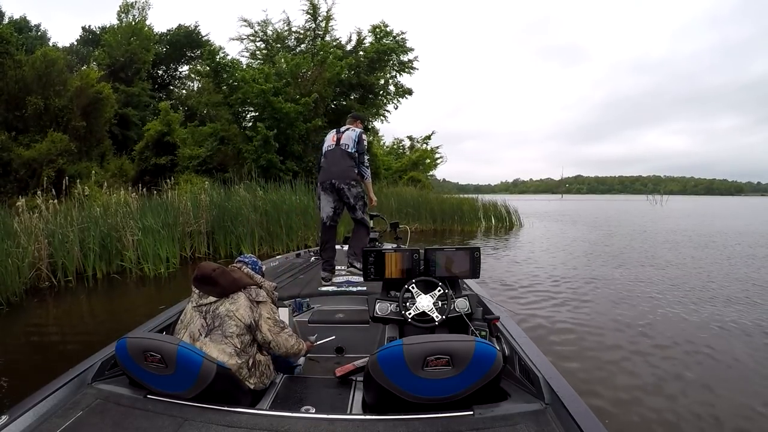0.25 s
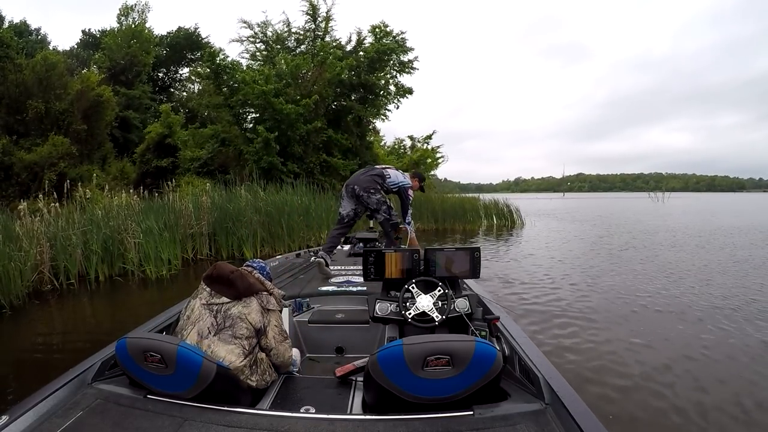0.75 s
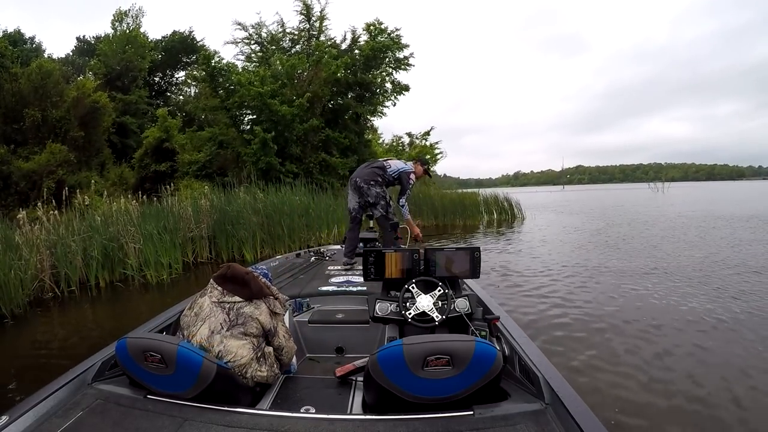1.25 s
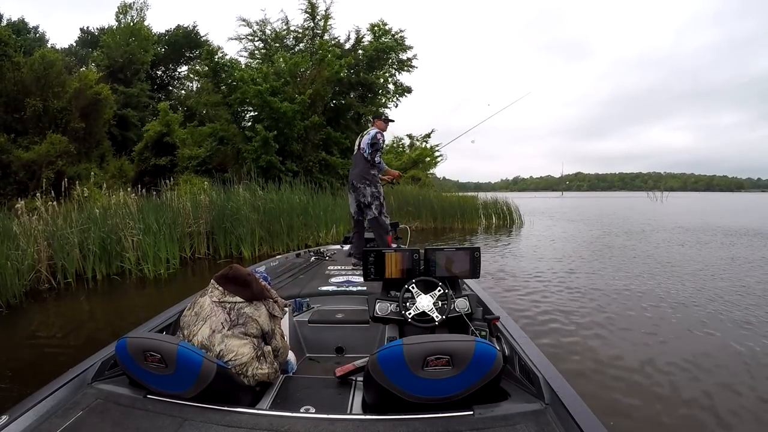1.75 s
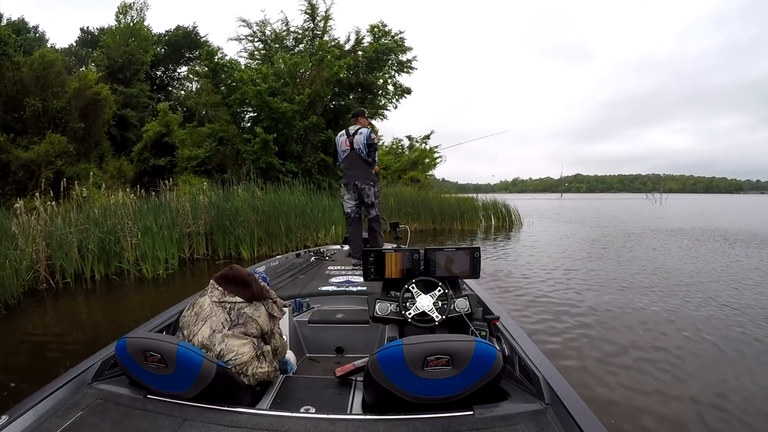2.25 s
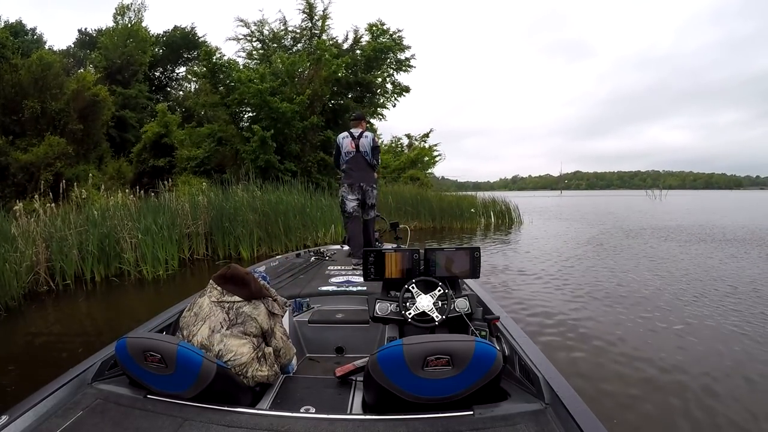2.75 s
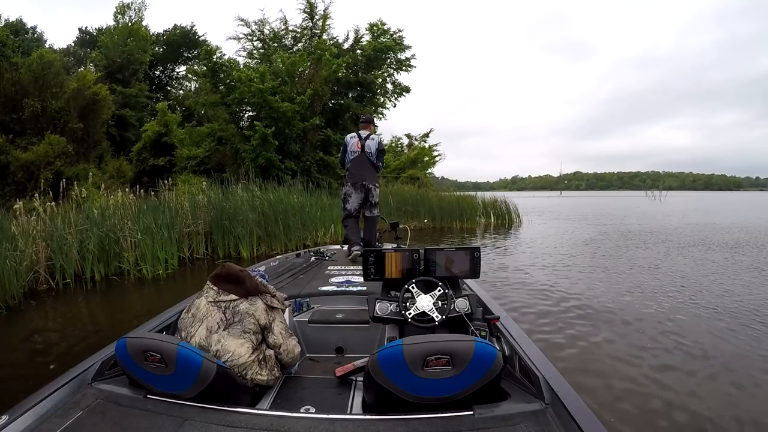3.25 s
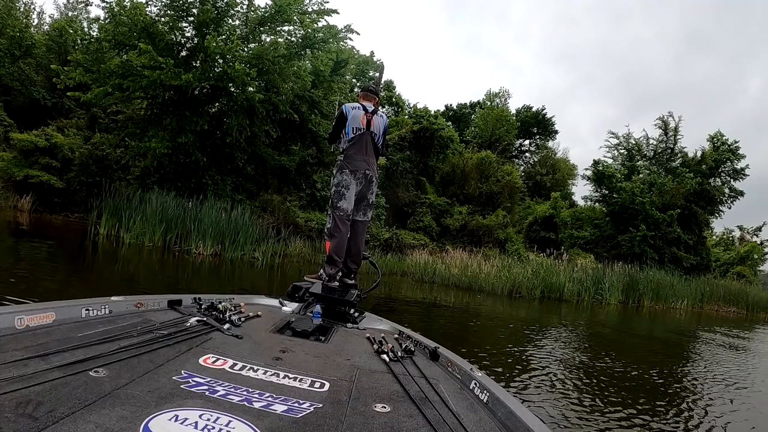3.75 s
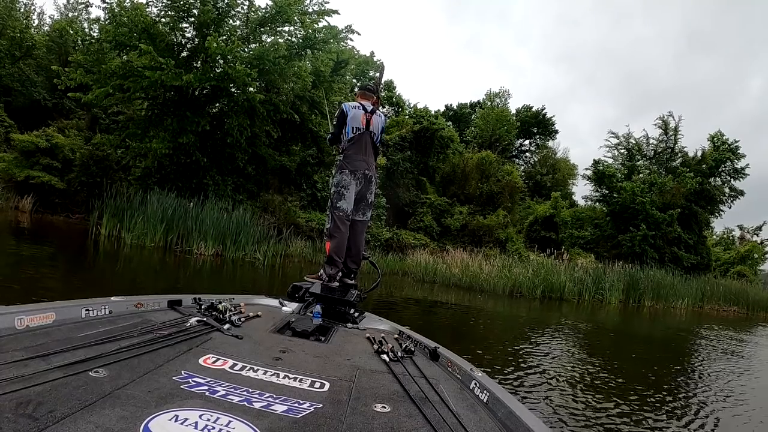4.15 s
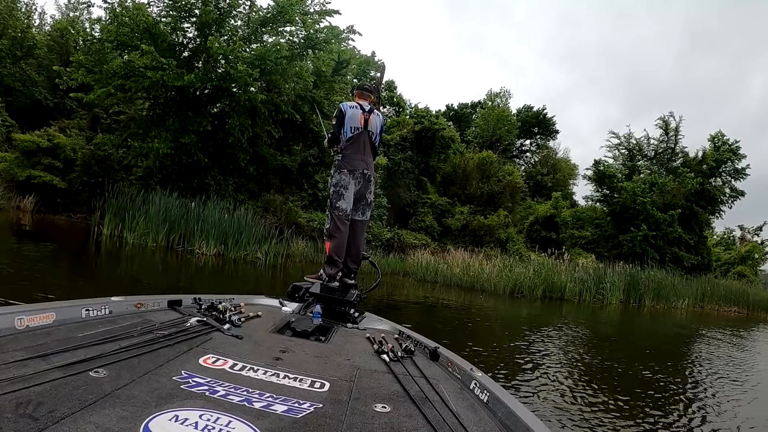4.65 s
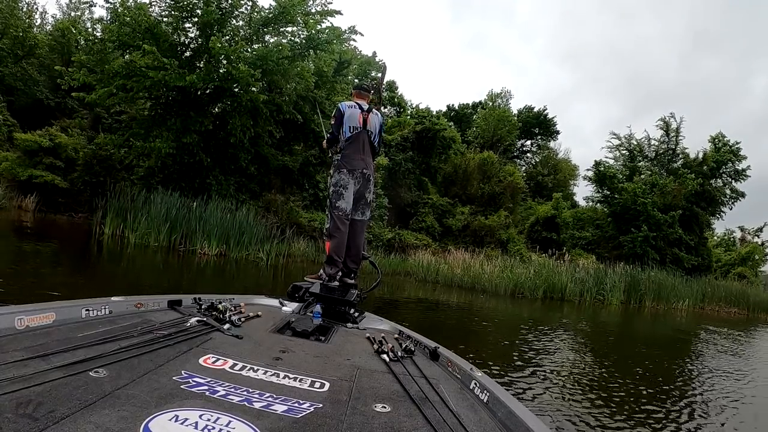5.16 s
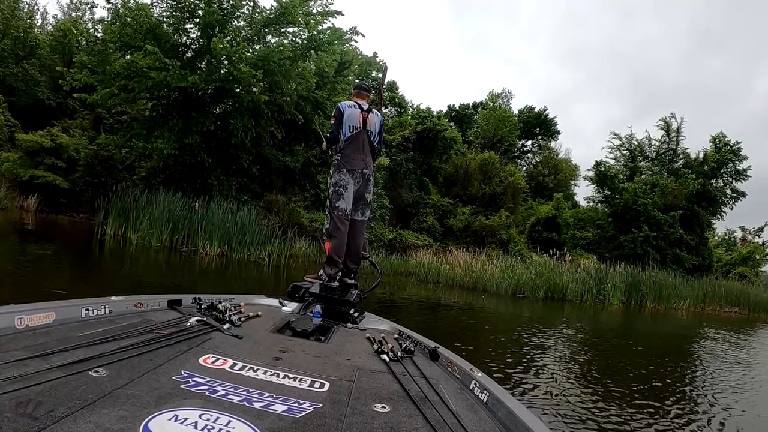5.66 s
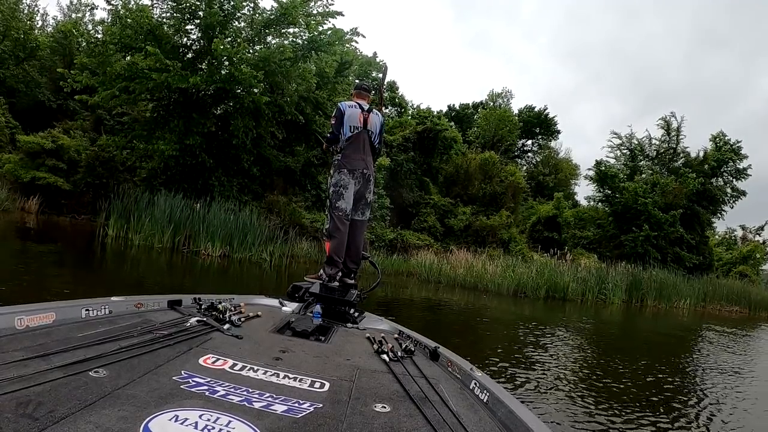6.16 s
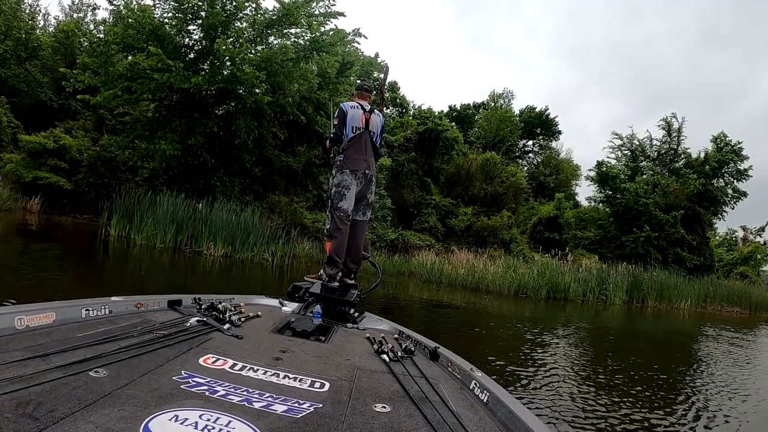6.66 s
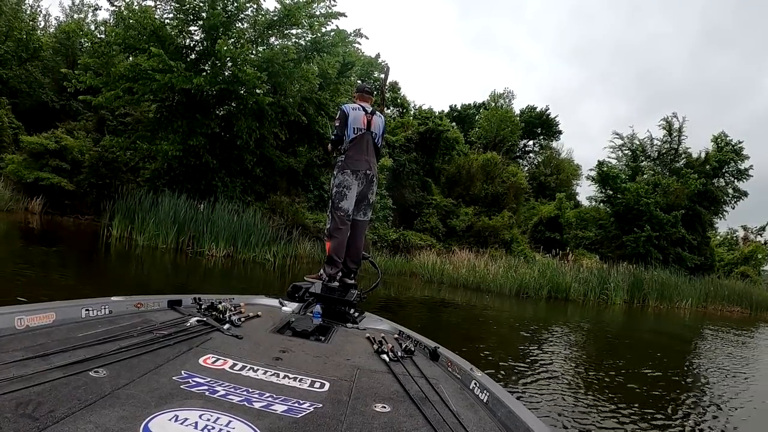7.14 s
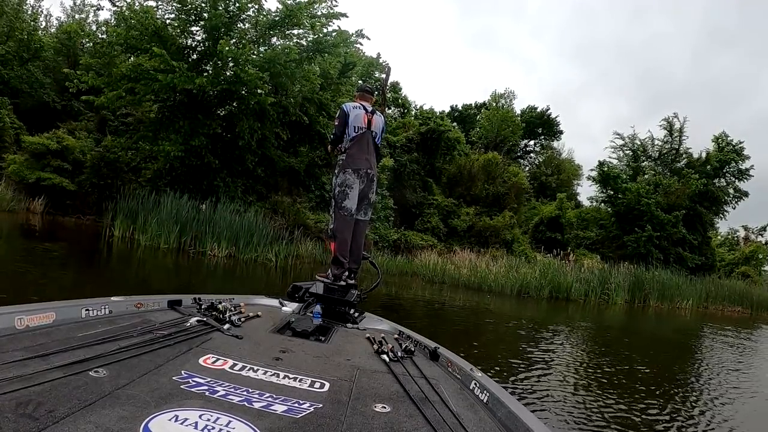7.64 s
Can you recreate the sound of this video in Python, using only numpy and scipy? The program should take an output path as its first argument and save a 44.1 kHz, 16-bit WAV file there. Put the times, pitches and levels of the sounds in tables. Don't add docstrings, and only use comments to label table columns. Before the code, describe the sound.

First, a close, nearly mono microphone catches boots and fishing gear striking a carpeted hollow deck, with gusts buffeting it and loose metal tinkling. The bustle stops at an abrupt cut. Then an open, wide stereo lakeside: gentle wind, distant wash, a small bird repeating a buzzy, falling whistle, faint far birds, a few dry plastic clicks with leafy echoes, and a slight brush of fabric near the end.

```python
import sys
import numpy as np
from scipy import signal
from scipy.fft import rfft, irfft, next_fast_len
from scipy.io import wavfile
from scipy.ndimage import uniform_filter1d

SR = 44100
rng = np.random.default_rng(int(sys.argv[2]) if len(sys.argv) > 2 else 0)


def decibels_to_gain(level_db):
    exponent = np.asarray(level_db, float) / 20
    return 10 ** exponent


def master(y):
    cut = np.clip(np.atleast_2d(y).T, -1, 1)
    pcm = np.round(cut * 32767)
    wavfile.write(sys.argv[1], SR, pcm.astype(np.int16))


N = 348345

# [t/s, hull level/dB, gear level/dB, T60/s]
FLOOR = [(.0024, -38, -40, 0.06), (.2613, -37, -42, 0.08), (.4872, -33.5, -49, 0.16),
         (.6501, -59, -49, 0.022), (1.0376, -58, -52, 0.1), (1.1824, -21, -35.5, 0.075),
         (1.2285, -46, -37.5, 0.039), (1.3086, -39, -54, 0.064), (1.475, -28.5, -40, 0.14),
         (1.5181, -22.5, -43, 0.059), (1.898, -26.5, -32, 0.043), (1.9613, -40, -49, 0.15),
         (2.005, -52, -45, .123), (2.0443, -38, -51, 0.22), (2.27, -28.5, -38, .07), (3.139, -41, -56, .03),
         (2.93, -28.5, -45, .06), (.52, -42, -54, .08), (.79, -41, -54, 0.074), (2.183, -40.5, -57, 0.063),
         (2.39, -40.5, -53, 0.021), (2.935, -26.5, -46, 0.052), (3.0302, -33.5, -43.5, 0.19),
         (3.1914, -59, -48, 0.012)]
# [t/s, hull level/dB, gear level/dB, T60/s]
HATCH = [(1.288, -27, -41.5, 0.061), (1.6885, -35.5, -35.5, 0.065), (1.7838, -21.5, -24.5, 0.083),
         (2.061, -32, -41.5, 0.049), (2.5284, -35, -46, 0.12), (2.603, -35, -31, 0.084),
         (2.624, -23.5, -33.5, 0.11), (3.1066, -35, -41, 0.022), (3.1664, -39, -60, 0.065),
         (3.2171, -32, -49, 0.059), (3.2737, -28, -40.5, 0.052), (3.6574, -37, -34.5, 0.086)]
# [t/s, hull level/dB, gear level/dB, T60/s]
BOX = [(.8797, -66, -46.5, 0.46), (1.5362, -26.5, -36.5, 0.083), (1.648, -17, -27.5, 0.072),
       (1.9273, -31, -41.5, 0.094), (3.3242, -30.5, -44.5, 0.095), (3.5509, -28, -34.5, 0.068),
       (3.5745, -33.5, -45, 0.041), (3.6788, -29, -49, 0.043)]
# [t/s, hull level/dB, gear level/dB, T60/s]
SEAT = [(.5419, -45, -36, 0.046), (.7498, -57, -47, 0.023), (1.08, -26.5, -38.5, 0.026),
        (1.7379, -37, -38.5, 0.043), (1.8412, -27, -35.5, 0.07), (1.8636, -31, -38.5, 0.11),
        (2.5619, -47, -40, 0.17), (2.8423, -29, -35, 0.092), (3.4165, -42.5, -43, 0.07),
        (.15, -42, -44.5, 0.15), (.21, -52, -44.5, 0.14), (.81, -50, -53, 0.032), (1.7975, -30, -31, 0.043),
        (2.347, -46, -54, 0.021), (3.635, -47, -51, .06)]
# [t/s, hull level/dB, gear level/dB, T60/s]
LOCKER = [(.611, -51, -39.5, 0.039), (1.26, -36, -50.5, 0.095), (1.623, -32, -32, 0.081),
          (1.8086, -24.5, -30, 0.083), (2.7132, -44.5, -50, 0.058), (2.9267, -18.5, -32.5, 0.052),
          (3.0655, -38.5, -40, 0.062), (2.2705, -32, -50, 0.06), (3.26, -33.5, -44.5, 0.16)]
# [t/s, hull level/dB, gear level/dB, T60/s]
RAIL = [(.9168, -34, -29.5, 0.034), (1.5673, -33, -30.5, 0.061), (2.483, -38, -45, 0.087),
        (2.4954, -22, -30.5, 0.08), (2.9003, -29, -40, 0.12), (3.6994, -33, -37, 0.051)]
# [f/Hz, level/dB per Hz]
CRACK = [(2120, -3), (3600, 0), (4580, -3), (7100, -12), (8130, -13.5), (12900, -33.5), (15700, -43)]
# [f/Hz, width/Hz, level/dB]
DECK_MODES = [(1083, 51, 7), (1417, 55, 9), (2176, 110, -2), (2280, 35, -1.5), (2640, 480, -3),
              (3000, 63, -32), (3180, 37, -14)]
# [t/s, level/dB, centre f/Hz, T60/s]
EDGES = [(0.4004, -38.5, 3810, 0.04), (0.605, -36, 4050, 0.038), (0.7462, -39.5, 4450, 0.05),
         (0.9158, -25.5, 3700, 0.041), (1.037, -34, 3180, 0.067), (1.2044, -44, 3850, 0.058),
         (1.2314, -38, 3360, 0.043), (1.311, -44, 3900, 0.057), (1.548, -33, 4160, 0.034),
         (1.57, -33, 3150, 0.042), (1.6215, -26.5, 3260, 0.05), (1.6488, -24, 3460, 0.036),
         (1.6884, -29, 3650, 0.05), (1.7144, -40, 4050, 0.05), (1.7816, -20.5, 3060, 0.058),
         (1.7966, -27.5, 5940, 0.05), (1.8187, -24.5, 3410, 0.035), (1.8844, -39, 3250, 0.05),
         (1.896, -31.5, 3190, 0.036), (2.0014, -45, 3430, 0.05), (2.0604, -39.5, 3520, 0.039),
         (2.3444, -65, 3210, 0.045), (2.497, -27, 3300, 0.059), (2.5114, -32, 3380, 0.05),
         (2.5267, -32, 3410, 0.05), (2.5447, -33.5, 3380, 0.05), (2.5686, -32.5, 5000, 0.05),
         (2.604, -22, 4060, 0.05), (2.6294, -35, 4590, 0.045), (2.645, -35, 4570, 0.027),
         (2.8429, -39.5, 3560, 0.05), (2.909, -33, 3660, 0.07), (2.9444, -38, 3770, 0.056),
         (3.0674, -30.5, 3410, 0.05), (3.0844, -44, 3310, 0.055), (3.191, -44.5, 5500, 0.041),
         (3.273, -46, 3400, 0.05), (3.397, -42, 3500, 0.079), (3.4186, -51, 6980, 0.06),
         (3.419, -36.5, 3300, 0.063), (3.5344, -47, 3700, 0.075), (3.5521, -31, 3160, 0.05),
         (3.599, -44, 3190, 0.05), (3.6394, -45, 3080, 0.039), (3.6582, -30.5, 3840, 0.05),
         (3.674, -40, 5060, 0.05)]
# [t/s, f/Hz, level/dB, T60/s]
TINKS = [(0.884, 2600, -43.5, 0.038), (.88, 6500, -51, 0.12), (1.474, 5100, -38, 0.038),
         (1.473, 11940, -58, 0.027), (1.505, 5050, -44, 0.027), (1.5, 8900, -66, .14),
         (1.9, 4600, -62, 0.051), (1.931, 4770, -57, 0.14), (2.5, 5130, -36.5, 0.049),
         (2.5, 3360, -38, 0.14), (2.56, 5060, -38.5, 0.15), (2.564, 8020, -50, 0.21),
         (2.56, 2130, -38, 0.038), (2.605, 3640, -51, 0.017), (2.61, 4600, -35.5, 0.09),
         (2.63, 11180, -65, 0.047), (2.65, 7870, -67, 0.073), (2.69, 9000, -74, 0.124),
         (3.285, 7070, -59, 0.079), (3.418, 2655, -47, 0.025), (3.545, 7340, -54, 0.036),
         (3.549, 9466, -48, 0.015), (3.66, 11200, -63, 0.036), (.918, 15000, -73, .05),
         (2.51, 11860, -62, .05), (2.628, 4590, -38, 0.064), (2.535, 3400, -43, .05),
         (2.602, 3910, -38, .035), (2.605, 8800, -48, 0.085), (2.605, 11200, -61, .12),
         (2.61, 15100, -77, .11), (2.63, 5300, -45, 0.047), (2.64, 13000, -70, .06),
         (3.59, 14100, -80, .05), (3.66, 15700, -68, .08), (3.66, 8400, -55, .04)]
# [t/s, level/dB]
STIR = [(0.0, -42.5), (.1, -44), (.31, -48.5), (.8, -46.5), (1.06, -55), (1.3, -55), (1.44, -55),
        (1.52, -48), (1.68, -41), (1.75, -48.5), (1.78, -45), (2.01, -60.5), (2.23, -57.5), (2.8, -53),
        (3.09, -54.5), (3.47, -59.5), (3.66, -47), (3.72, -44)]
# [f/Hz, level/dB per Hz]
RUSTLE = [(150, -38), (250, -5), (666, -14), (919, -18.5), (1500, -20), (2450, -24), (4730, -29.5),
          (8700, -40), (12600, -56), (14200, -78)]
# [t/s, level/dB]
GUST = [(0.0, -30.5), (.1, -24), (.31, -35.5), (.8, -33.5), (1.06, -38.5), (1.9, -45.5), (2.23, -40),
        (3.09, -37.5), (3.47, -41), (3.66, -32.5), (3.72, -39)]
# [f/Hz, level/dB per Hz]
STERN_WIND = [(8.8, -40), (15, 4), (32, 4), (146, -3), (291, -22), (373, -22.5), (425, -27), (500, -24),
              (650, -44), (1100, -120)]
# [t/s, level/dB, f/Hz]
SHOVES = [(0.099, -21.5, 86.1), (0.139, -26, 51.1), (0.174, -25, 94.2), (0.19, -18, 94.2),
          (0.289, -33, 59.2), (0.548, -23, 111), (0.62, -33, 72), (0.699, -26, 87), (0.772, -33, 56),
          (0.825, -24.5, 53.8), (0.844, -21, 111), (0.969, -29.5, 69.6), (1.328, -25, 68), (2.199, -31, 75),
          (2.388, -31, 84), (2.769, -30.5, 107), (3.12, -20.5, 59.2), (3.522, -25.5, 80), (3.627, -36, 110),
          (3.644, -29, 56.5)]
# [f/Hz, side minus mid level/dB]
STERN_SIDE = [(60, -86), (110, -75), (200, -68.5), (380, -49.5), (700, -43), (1290, -43.5), (2380, -39.5),
              (4400, -31), (8120, -23), (15000, 1)]
# [t/s, start f/Hz, level/dB]
SLURS = [(3.748, 2005, -42.5), (4.126, 1983, -42.5), (4.508, 2100, -43), (4.89, 2140, -42)]
# [t after slur/s, length/s, start f/Hz, end f/Hz, level/dB]
RISES = [(-.097, 0.0236, 1740, 2400, -56.5)]
# [t after slur/s, length/s, start f/Hz, end f/Hz, level/dB]
BUZZ = [(-.072, 0.018, 3050, 3000, -49), (-.058, 0.0318, 2800, 2977, -52),
        (-0.084, 0.045, 4250, 4300, -62.5), (-0.1, .055, 5700, 5950, -74.5),
        (-0.097, 0.053, 8200, 8500, -78), (-0.087, 0.063, 4800, 4700, -74)]
# [t after slur/s, length/s, start f/Hz, end f/Hz, level/dB]
PLAIN = [(-.08, .013, 2140, 2530, -52), (.172, .055, 2500, 1950, -65)]
OVERTONES_DB = [0, -4, -24]
# [t/s, length/s, start f/Hz, end f/Hz, level/dB]
FAR = [(3.808, 0.095, 7786, 7850, -79), (4.576, 0.073, 2600, 2890, -69), (4.66, 0.083, 3695, 4370, -78),
       (4.732, 0.086, 4400, 4270, -76), (4.97, 0.055, 5900, 5080, -76), (5.08, 0.13, 4120, 4270, -77),
       (5.211, 0.042, 2690, 2670, -66), (5.37, 0.073, 2300, 2830, -69), (6.605, 0.046, 7560, 7300, -89)]
# [t/s, snap peak level/dB, housing level/dB, housing f/Hz, left minus right level/dB]
REEL = [
    (4.0147, -60, -59, 1332, -12),
    (4.029, -48, -37, 1530, 1),
    (4.04, -36.5, -40, 2280, 4),
    (5.4144, -73.5, -67, 1560, -1.5),
    (6.1625, -41, -44, 1150, 4),
    (6.6966, -59, -71, 1380, 6),
    (6.723, -46, -38, 1490, 2.5),
    (6.7359, -31, -32, 2300, 5.5),
    (6.149, -60, -68, 2000, 3),
]
# [f/Hz, level/dB per Hz]
REEL_TONE = [(1470, -52), (2500, 5.5), (2980, -1.5), (3910, 4), (5830, 0.5), (8900, -1.5), (14500, -24),
             (15700, -25)]
# [t/s, level/dB]
JACKET = [(7.5, -81), (7.622, -66.5), (7.899, -77.5)]
# [t/s, level/dB]
BOW_GUST = [(3.7, -49), (4.69, -48), (7.85, -46), (7.9, -51)]
# [f/Hz, level/dB per Hz]
BOW_WIND = [(8.8, -41), (15, -6), (38, 0.5), (76, -1.5), (97, -6), (166, -4.5), (353, -33.5), (400, -35.5),
            (520, -64), (880, -120)]
# [f/Hz, level/dB per Hz]
LAKE = [(150, -29), (250, -4), (320, -11), (390, -8.5), (591, -16), (757, -8.5), (809, -12.5),
        (1260, -10.5), (1920, -19.5), (3950, -30), (6490, -36), (13000, -56.5)]
# [f/Hz, likeness/0-1]
ALIKE = [(60, 0.97), (130, 0.98), (290, 0.8), (640, 0.456), (1410, 0.26), (3100, 0.37), (6820, 0.12),
         (15000, 0.12)]
# [f/Hz, left minus right level/dB]
LEAN = [(60, 0), (380, 0.5), (700, 6.5), (1290, 5.5), (2380, 7.5), (4400, 3), (8120, 1.0), (15000, -4)]


def read(table, hz):
    f, v = np.transpose(table)
    return np.interp(np.log(hz + 1), np.log(f + 1), v)


def unit(x):
    return x / np.sqrt(np.mean(x ** 2))


def track(table):
    s, db = np.transpose(table)
    return np.interp(np.arange(N) / SR, s, db, -120, -120)


def colour(x, table):
    size = next_fast_len(x.shape[-1] + 1024)
    gain = decibels_to_gain(read(table, np.arange(size // 2 + 1) * SR / size))
    return irfft(rfft(x, size) * gain, size)[..., :x.shape[-1]]


def ring(x, hz, t60):
    pole = np.exp(2j * np.pi * hz / SR - np.log(1000) / (t60 * SR))
    return signal.lfilter([1 - abs(pole)], [1, -pole], x).imag


def add(out, x, s):
    i = int(s * SR)
    out[..., i:i + x.shape[-1]] += x[..., :N - i]


def peak(x, db):
    return x * decibels_to_gain(db) / np.sqrt(uniform_filter1d(x ** 2, 176).max())


def walk(rate_hz):
    k = int(SR / rate_hz)
    held = np.repeat(rng.standard_normal(N // k + 1), k)
    return uniform_filter1d(uniform_filter1d(held, k), k)[:N]


def pan(x, db):
    return x * decibels_to_gain(np.array([[db], [-db]]) / 2)


def burst(t60, rise_s, rattle_db, strike=0):
    t = np.arange(6400) / SR
    grains = decibels_to_gain(rattle_db * np.repeat(rng.standard_normal(100), 64))
    contact = strike * np.exp(-((t - .0012) / .00008) ** 2)
    envelope = (1 - np.exp(-t / rise_s)) * decibels_to_gain(-60 * (t / max(t60, .005)) ** 1.404)
    return envelope * grains * rng.standard_normal(len(t)) + contact


def knock(thud_db, clatter_db, t60, hollow_hz, crack_db):
    length = int(t60 * SR) + 1500
    blow = burst(t60 * 0.929, 0.027 * t60, 5.06, strike=1.3)[:length]
    clatter = burst(t60 * 1.07, 0.027 * t60, 3.8, strike=.8)[:length]
    scuff = burst(t60 * 1.08, 0.027 * t60, 1.6)[:length]
    scuff = colour(colour(scuff, CRACK), [(6000, 0), (15000, 0.24 * (crack_db + 16.0))])

    spread = 1 + 0.063 * rng.standard_normal(16)
    hull_modes = [(1.05, 1.0), (0.574, 0.12), (1.503, 0.52), (1.97, 0.58)]
    thud = sum(gain * ring(blow, hollow_hz * ratio * detune, 0.03)
               for (ratio, gain), detune in zip(hull_modes, [1, *spread]))
    lids = sum((-1) ** k * decibels_to_gain(db) * ring(clatter, hz * spread[4 + k], 3.1 / max(width_hz, 180))
               for k, (hz, width_hz, db) in enumerate(DECK_MODES))

    low_scrape = colour(blow, [(120, -31.5), (250, -1.5), (900, -0.5), (1400, -73.0), (4000, -86.0)])
    high_scrape = colour(clatter, [(600, -58), (1000, 3), (3200, -5.5), (4200, -38.5), (9000, -79)])
    thud = unit(thud) + 0.56 * unit(low_scrape)
    lids = unit(lids) + 0.52 * unit(high_scrape)
    body = peak(thud, thud_db + 0.038) + peak(lids, clatter_db + 0.034)
    body = colour(body, [(4000, 0.0), (9000, -26)])
    crack = peak(scuff, crack_db + 0.25 * min(crack_db + 46, 0))
    return (body + crack) * np.minimum(np.arange(len(body)) / 24, 1)


def knocks():
    out = np.zeros(N)
    # blows, hollow note f/Hz, crack above gear/dB
    places = [(FLOOR, 260, -4), (HATCH, 337, -5), (BOX, 394, -4),
              (SEAT, 542, -5.5), (LOCKER, 674, -1.9), (RAIL, 848, -2.1)]
    for blows, hollow_hz, crack_db in places:
        for s, thud_db, clatter_db, t60 in blows:
            add(out, knock(thud_db, clatter_db, t60, hollow_hz, clatter_db + crack_db), s - .001)
    well_t60_s, well_db = 0.29, -6.5
    t = np.arange(int(.2 * SR)) / SR
    well = rng.standard_normal(len(t)) * decibels_to_gain(-60 * t / well_t60_s)
    well = colour(well, [(300, -20.5), (1500, -12.5), (5000, 1.0), (10000, 27.0)])
    return out + decibels_to_gain(well_db) * signal.fftconvolve(out, well / np.sqrt(np.sum(well ** 2)))[:N]


def edges():
    out = np.zeros(N)
    for s, db, hz, t60 in EDGES:
        tone = [(hz * .3, -24), (hz * 0.94, 0.1), (hz * 1.49, -6), (12000, -28), (16000, -48)]
        snap = colour(burst(t60, rise_s=0.0019, rattle_db=3.0, strike=0.64)[:3000], tone)
        add(out, peak(snap, db - 9.5), s - .001)
    return out


def tinks():
    out = np.zeros(N)
    for s, hz, db, t60 in TINKS:
        t = np.arange(int(SR * (t60 + .01))) / SR
        shake = np.interp(t * 310, np.arange(100), rng.standard_normal(100))
        fade = (1 - np.exp(-t / .0035)) * decibels_to_gain(-48 * (t / t60) ** 1.66 + 4.6 * shake)
        add(out, peak(fade * np.sin(2 * np.pi * hz * t + 1.25 * shake), db), s)
    return out


def cloth_and_carpet(stir_db):
    ticks = (rng.random(N) < 110 / SR) * decibels_to_gain(2.6 * rng.exponential(size=N))
    ticks = signal.lfilter([1], [1, -np.exp(-1 / (0.0047 * SR))], ticks)
    grains = decibels_to_gain(2.3 * walk(27.95) + 0.56 * walk(300))
    rustle = colour(rng.standard_normal(N) * (grains + 0.15 * ticks), RUSTLE)
    bright = colour(rustle, [(1800, -46), (3000, 6.5)])
    body = colour(rustle - bright, [(400, -29.5), (650, -7)])
    bright_db = -51.5 + 1.05 * (stir_db + 51)
    return unit(body) * decibels_to_gain(stir_db - 1.5) + unit(bright) * decibels_to_gain(bright_db - 1.5)


def buffet(stir_db, gust_db):
    db = -49 + 0.35 * (stir_db + 51.0) + 0.086 * (gust_db + 41.5)
    noise = rng.standard_normal(N) * decibels_to_gain(6.3 * walk(24.96))
    thump = colour(noise, [(150, 0.0), (220, 12.0), (500, -8.5), (800, -30.5), (2000, -90)])
    return unit(thump) * decibels_to_gain(db - 1.5)


def shoves():
    out = np.zeros(N)
    for s, db, hz in SHOVES:
        turns = np.arange(int(1.25 * SR / hz)) * hz / SR
        add(out, decibels_to_gain(db - 1.4) * np.sin(2 * np.pi * turns) * np.hanning(len(turns)) ** .6, s - .003)
    return out


def air(table, flicker_db, flicker_hz, channels=2):
    size = next_fast_len(N)
    hz = np.arange(size // 2 + 1) * SR / size
    share = np.clip(read(ALIKE, hz), 0, 1) ** .5
    one, other = rfft(rng.standard_normal((2, size)))
    lean = decibels_to_gain(read(LEAN, hz) / 2)
    left = one * lean
    right = (share * one + np.sqrt(1 - share ** 2) * other) / lean
    both = decibels_to_gain(read(table, hz)) * np.array([left, right])[:channels]
    octave, out = np.log2(hz + 1), 0
    for centre in np.arange(np.log2(table[1][0]), np.log2(table[-2][0]) + 1):
        band = np.cos(np.pi / 2 * np.clip(octave - centre, -1, 1)) ** 2
        out = out + irfft(both * band, size)[:, :N] * decibels_to_gain(flicker_db * walk(flicker_hz))
    return unit(out)


def stern():
    gust_db, stir_db = track(GUST), track(STIR)
    wind = air(STERN_WIND, flicker_db=2.0, flicker_hz=12, channels=1)[0] * decibels_to_gain(gust_db)
    deck = knocks() + edges() + tinks() + cloth_and_carpet(stir_db)
    mid = deck + wind + buffet(stir_db, gust_db) + shoves()
    scatter = rng.standard_normal(128) / np.sqrt(128)
    side = colour(np.convolve(mid, scatter, "same"), STERN_SIDE)
    return np.array([mid + side, mid - side])


def whistle(hz, db, overtones_db=(0,)):
    phase = 2 * np.pi * np.cumsum(hz) / SR
    tones = sum(decibels_to_gain(g) * np.sin((k + 1) * phase) for k, g in enumerate(overtones_db))
    return np.sqrt(2) * decibels_to_gain(db) * tones


def note(length_s, hz0, hz1, db, throb, overtones_db=(0,)):
    t = np.arange(int(length_s * SR)) / SR
    pulse = np.cos(2 * np.pi * 120 * t + np.cumsum(0.11 * rng.standard_normal(len(t))))
    waver = 1 + 0.28 * throb * uniform_filter1d(rng.standard_normal(len(t)), size=60)
    tone = whistle(np.linspace(hz0, hz1, len(t)) * waver, db, overtones_db)
    return tone * (1 - np.clip(throb, 0, 1) * pulse) * np.sin(np.pi * t / length_s) ** 0.47


def songbird():
    out = np.zeros(N)
    knee_s, knee_hz, sag_hz_per_s, slur_s = .024, 1834, 4200, 0.13
    t = np.arange(0, slur_s, 1 / SR)
    turns_s = [0, knee_s, slur_s]
    for s, start_hz, db in SLURS:
        hz = np.interp(t, turns_s, [start_hz, knee_hz, knee_hz - sag_hz_per_s * (slur_s - knee_s)])
        swell_db = np.interp(t, turns_s, [-5, 0, -27.5])
        add(out, whistle(hz, db + swell_db) * signal.windows.tukey(len(t), .1), s)
        for at, *shape in RISES:
            add(out, note(*shape, 0, OVERTONES_DB) * decibels_to_gain(0.94 * rng.standard_normal()), s + at)
        for at, *shape in PLAIN:
            add(out, note(*shape, throb=0), s + at)
        for at, *shape in BUZZ:
            add(out, note(*shape, throb=0.84) * decibels_to_gain(0.54 * rng.standard_normal()), s + at)
    return out


def far_birds():
    out = np.zeros(N)
    for s, *shape in FAR:
        call = note(*shape, throb=.33)
        leaves = 1 + uniform_filter1d(rng.standard_normal(len(call)), size=200) * 7
        add(out, call * leaves, s)
    return out


def trees(x, gap_s, t60, db, tone):
    t = np.arange(int(.6 * SR)) / SR - gap_s
    envelope = (t > 0) * (1 - np.exp(-abs(t) / 0.0033)) * decibels_to_gain(-60 * abs(t) / t60)
    leaves = colour(rng.standard_normal((2, len(t))) * envelope, tone)
    leaves = leaves / np.sqrt(np.sum(leaves ** 2) / 2)
    return decibels_to_gain(db) * signal.fftconvolve(x[None], leaves, axes=1)[:, :N]


def reel():
    out, snaps = np.zeros((2, N)), np.zeros(N)
    snap_t60_s, housing_t60_s = .012, .024
    for s, snap_db, low_db, hz, pan_db in REEL:
        blow = burst(.014, rise_s=.0015, rattle_db=2, strike=2)[:3000]
        housing = ring(blow, hz, housing_t60_s)
        housing = housing + 0.46 * ring(blow, 1320, 0.012) + 0.23 * ring(blow, 1920, 0.0022)
        housing = colour(housing, [(600, -29.5), (1100, -15.0), (3000, -6.5), (8000, -47.0)])
        snap = unit(colour(blow, REEL_TONE))
        snap = snap + 0.13 * unit(ring(blow, 3970, snap_t60_s)) + .2 * unit(ring(blow, 5500, snap_t60_s))
        add(out, pan(peak(snap, snap_db + 0.09) + peak(housing, low_db + 0.12), pan_db), s)
        snaps[int(s * SR)] += decibels_to_gain(snap_db + 23.0)
    tone = [(700, -27), (1500, -3.0), (4500, 2.5), (7000, -0.5), (10000, -13.5), (14000, -31.0), (15200, -60)]
    return out + trees(snaps, gap_s=0.036, t60=0.43, db=-8, tone=tone)


def jacket():
    cloth = rng.standard_normal((2, N)) * decibels_to_gain(4.6 * walk(45))
    tone = [(1500, -4.0), (3500, 2.5), (6000, -2), (9000, -6), (12000, -26.5), (15000, -52)]
    return unit(colour(cloth, tone)) * decibels_to_gain(track(JACKET))


def bow():
    song = songbird() + far_birds()
    echo_tone = [(1500, -5.5), (3000, 6.0), (4300, 5.5), (5800, 7.5), (9000, 7.5)]
    echo = trees(song, gap_s=0.0018, t60=0.75, db=-0.42, tone=echo_tone)
    wind = air(BOW_WIND, flicker_db=-2.0, flicker_hz=6) * decibels_to_gain(track(BOW_GUST))
    lake = air(LAKE + [(14500, -95)], flicker_db=.8, flicker_hz=14) * decibels_to_gain(-60)
    return pan(song, 1.5) + echo + reel() + jacket() + wind + lake


def scene():
    change_s, fade_s = 3.708, 0.0041
    after = np.clip((np.arange(N) / SR - change_s) / fade_s, 0, 1)
    return stern() * (1 - after) + bow() * after


def roll_off(x):
    return signal.sosfilt(signal.butter(12, 15880, fs=SR, output="sos"), x)


def record(dry):
    mix = colour(dry, [(15700, 0), (15900, -60)])
    return roll_off(mix)


dry = scene()
out = record(dry)
master(out)
```